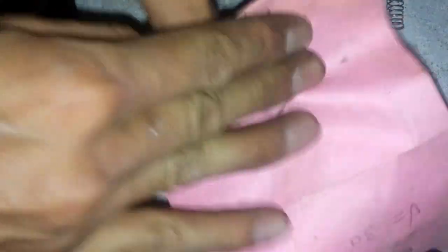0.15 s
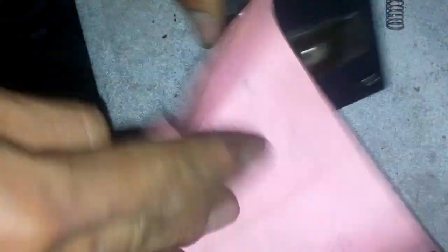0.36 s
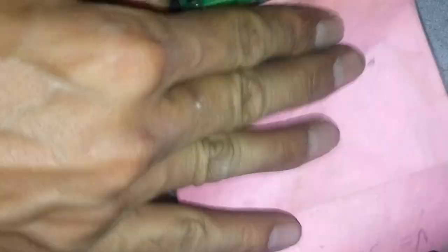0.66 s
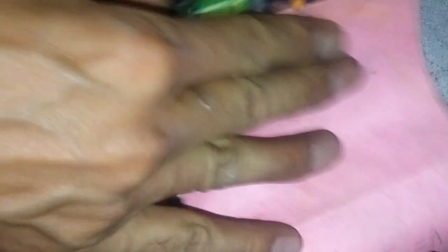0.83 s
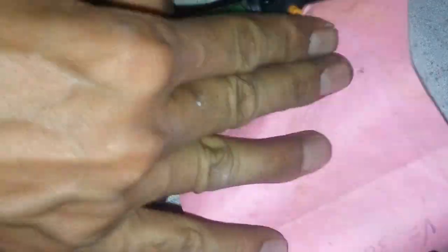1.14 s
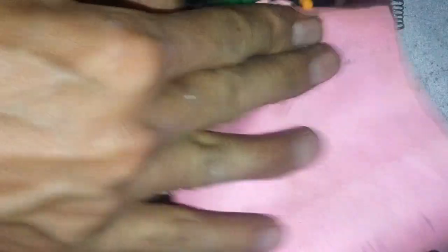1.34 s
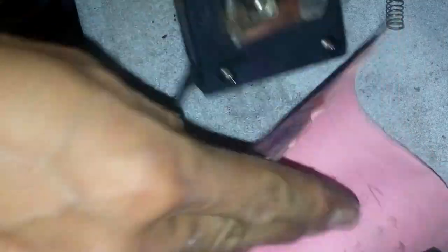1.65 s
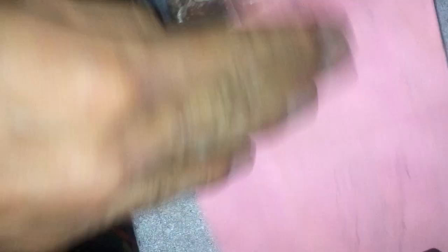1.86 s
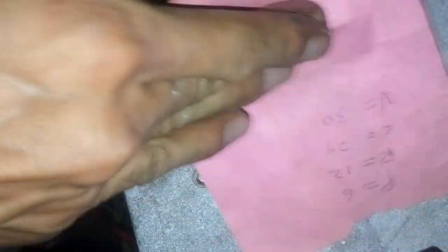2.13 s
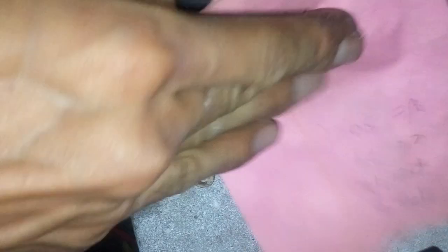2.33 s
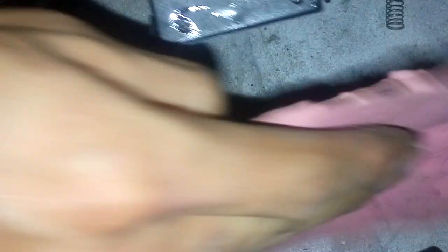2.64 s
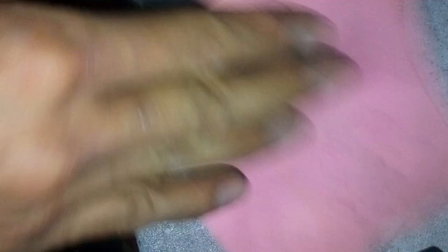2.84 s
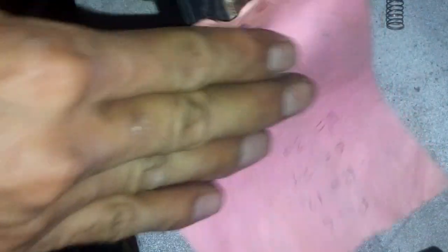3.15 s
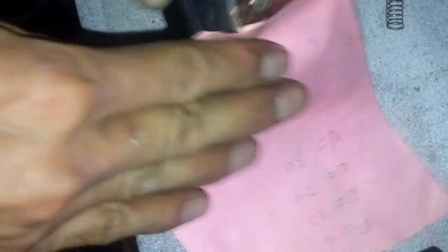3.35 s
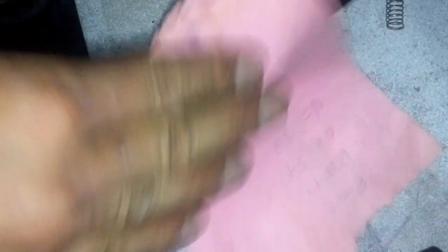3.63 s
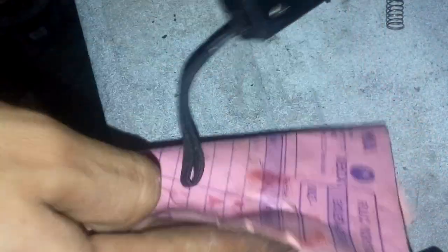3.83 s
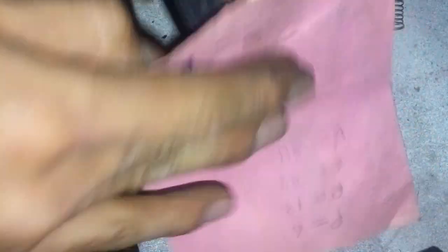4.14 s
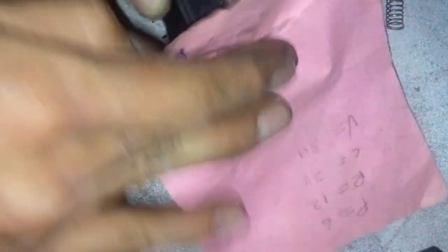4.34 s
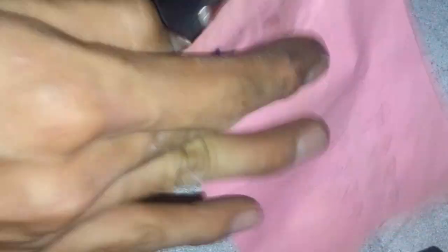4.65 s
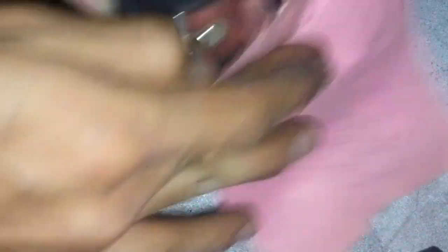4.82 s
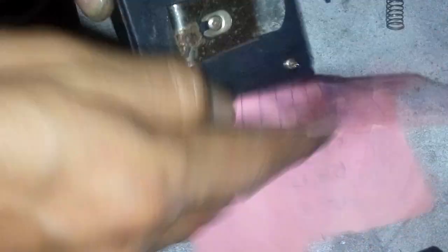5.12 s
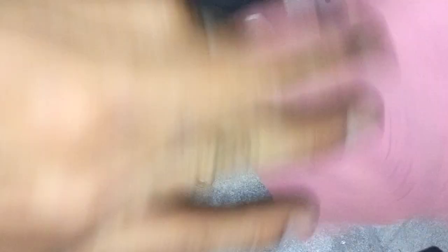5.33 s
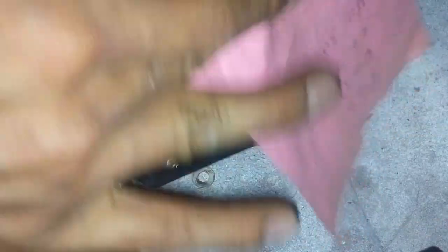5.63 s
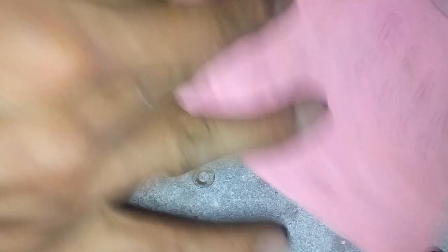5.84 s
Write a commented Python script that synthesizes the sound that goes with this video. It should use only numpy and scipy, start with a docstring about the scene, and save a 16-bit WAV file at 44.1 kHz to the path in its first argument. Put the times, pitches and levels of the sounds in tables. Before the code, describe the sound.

A hand quickly rubs a crisp paper sheet back and forth against a small tool, with bright raspy strokes and sharp crackling snaps.

```python
"""Small quiet room, at a workbench: a hand wipes a sheet of paper back and forth against a small tool.
Strokes rasp, rustle and swish: filtered noise and tiny slips, levelled by a half-sine speed.
Creases and edge snap and click: short rings with scatter, knocks and treble cracks.
The hand pats (dull noise bursts), the tool rocks (damped sines), a fingertip squeaks once (two harmonics).
A short room tail and a faint steady hiss lie behind."""
import sys
import numpy as np
from scipy import signal
from scipy.fft import rfft, irfft, next_fast_len
from scipy.io import wavfile
from scipy.ndimage import uniform_filter1d, minimum_filter1d, map_coordinates

SR = 44100
rng = np.random.default_rng(int(sys.argv[2]) if len(sys.argv) > 2 else 0)


def materialize(psi):
    """Save the field psi as 16-bit PCM at rate SR to the path in sys.argv[1].

    A 1-D psi becomes a single channel; in a 2-D psi each row is a channel.
    """
    bounded = np.clip(np.atleast_2d(psi).T, -1, 1)
    quanta = np.round(bounded * 32767).astype(np.int16)
    wavfile.write(sys.argv[1], SR, quanta)


N = 263715  # samples

# Levels are relative, ahead of the later filters.
# Strokes of the sheet, to and fro: (start [s], length [s], surface rasp [dB], flexing rustle [dB])
STROKES = [(-0.063, 0.16, -40.0, -44), (0.058, 0.098, -27.5, -37), (0.122, 0.13, -34, -45),
           (0.199, 0.2, -39.5, -45.5), (0.339, 0.21, -30, -40.5), (0.479, 0.14, -40.5, -46.5),
           (0.57, 0.21, -57.5, -64), (0.721, 0.076, -48.5, -57.5), (0.79, 0.052, -29, -34.5),
           (0.814, 0.13, -36.5, -47), (0.919, 0.11, -34.5, -40.5), (0.969, 0.19, -34.5, -44),
           (1.131, 0.093, -31, -42), (1.188, 0.16, -32.5, -41), (1.325, 0.11, -40.5, -49.5),
           (1.416, 0.11, -32.0, -41.5), (1.466, 0.43, -47.5, -49.5), (1.49, 0.23, -36, -44),
           (1.83, 0.19, -66, -73), (1.988, 0.18, -48.5, -53), (2.055, 0.027, -31.5, -30),
           (2.146, 0.06, -51.5, -56.5), (2.206, 0.13, -30, -38), (2.312, 0.13, -28.0, -35.5),
           (2.407, 0.14, -32.5, -40.5), (2.493, 0.34, -45, -49), (2.532, 0.13, -26, -34),
           (2.909, 0.128, -60, -71), (3.027, 0.065, -31.5, -37), (3.045, 0.18, -38.5, -51),
           (3.19, 0.13, -39, -47.5), (3.283, 0.093, -37.5, -50.5), (3.359, 0.12, -39.5, -55),
           (3.451, 0.13, -39.5, -51), (3.562, 0.1, -41.5, -51.5), (3.643, 0.15, -36.5, -51),
           (3.692, 0.21, -32, -42), (3.877, 0.072, -41, -48.5), (3.888, 0.16, -56, -64.5),
           (4.047, 0.082, -65.5, -80.5), (4.167, 0.194, -61, -69.5), (4.325, 0.079, -31.5, -37),
           (4.39, 0.15, -35, -47), (4.509, 0.12, -33, -42.5), (4.575, 0.15, -35.5, -44.5),
           (4.679, 0.18, -32.5, -41), (4.797, 0.15, -36.0, -47.5), (4.898, 0.15, -31.0, -43.5),
           (4.952, 0.36, -40.5, -51.0), (5.23, 0.12, -29.5, -38.5), (5.306, 0.093, -42.5, -49),
           (5.333, 0.21, -54.5, -64), (5.513, 0.073, -38.5, -36.0), (5.525, 0.13, -40.5, -43.5),
           (5.641, 0.18, -49, -58), (5.722, 0.22, -45.5, -57), (5.908, 0.13, -34, -46)]
# Creases buckling and the edge catching: (time [s], click level [dB], ring [Hz], sheet knock level [dB])
SNAPS = [(0.1041, 6.5, 5290, -18), (0.138, -14, 3660, -31), (0.2862, -11.5, 5160, -34),
         (0.414, -12, 5700, -31), (0.452, -5.5, 4930, -24), (0.541, -13, 5330, -41),
         (0.5661, -19, 4800, -34.5), (0.7103, -36.5, 5700, -48), (0.816, -3, 5380, -23.5),
         (0.8293, -9.5, 5260, -50), (0.8939, -18, 5270, -34.5), (0.9732, -19, 4350, -38),
         (1.0344, -11.5, 4830, -38), (1.038, -10.5, 4840, -29.5), (1.074, -12.5, 5530, -35.5),
         (1.1134, -24, 4160, -41), (1.2312, -22, 4300, -33), (1.274, -12, 5340, -36),
         (1.6474, -23.5, 5060, -32.5), (1.8476, -29.5, 2630, -53), (1.978, -40, 5000, -50),
         (2.0229, -21.5, 4960, -49), (2.0651, -39, 3250, -26), (2.1076, -28, 5400, -38),
         (2.2218, -5.5, 4620, -33), (2.2601, -7.5, 5100, -27), (2.2635, -7.5, 5250, -22.5),
         (2.282, -9, 5500, -24.5), (2.608, -6, 5100, -30), (2.6205, 0, 5200, -42), (2.7876, -30, 4690, -43),
         (3.045, -7.5, 5420, -34), (3.0515, -7, 5470, -32.5), (3.0621, -10, 5200, -31.5),
         (3.7245, -19, 6100, -38), (3.7611, -8, 5040, -33), (3.793, 0.5, 5150, -23),
         (4.3368, -23.5, 2470, -35), (4.358, -6.5, 5360, -31.5), (4.42, -22, 5500, -39),
         (4.4525, -9.5, 5180, -44), (4.5331, -16, 5440, -36), (4.571, -8, 5180, -47),
         (4.6055, -14, 5200, -31.5), (4.6204, -18.5, 5370, -47), (4.6379, -14, 5060, -40),
         (4.7202, -14.5, 4760, -36), (4.7795, -10, 5970, -28), (4.7941, -15, 5900, -36),
         (4.81, -11.5, 5270, -51), (5.0477, -13, 4500, -41.5), (5.0799, -14.5, 5230, -36),
         (5.5262, -22, 5050, -42), (5.5433, -11.5, 5560, -34), (5.5577, -12, 5440, -35),
         (5.7589, -26.5, 5470, -58)]
# Hand pressing on the bench: (time [s], level [dB], t60 [s])
PATS = [(.105, -65, 0.062), (0.809, -37.5, 0.12), (0.953, -54, 0.59), (2.066, -54, 0.33),
        (2.565, -53, 0.72), (3.046, -42, 0.19), (3.726, -52.5, 0.32), (4.339, -45.5, 0.15),
        (4.959, -51.5, 0.35), (5.531, -47, 0.44)]
# Sheet edge sweeping over the bench: (time [s], level over the rasp [dB])
EDGE_SWISH = [(0, -17.5), (1.62, -13), (1.82, 3.5), (2.1, -16.5), (3.3, -16), (3.62, -7), (3.95, -17.5),
              (4.4, -24.5)]
# Tool rocking on the bench: (time [s], level [dB])
BUMPS = [(1.225, -51), (1.345, -53), (1.423, -46), (1.518, -44.5), (4.610, -43.5), (4.689, -51)]
# Fingertip slip: (time [s], fundamental [Hz], level [dB])
SQUEAK = [(5.780, 2160, -64), (5.79, 2490, -35), (5.803, 2520, -41), (5.818, 2420, -54)]
# Noise spectrum of the sliding surface: (frequency [Hz], relative density [dB])
RASP_SPECTRUM = [(1200, -34.5), (2200, -21.5), (3200, -7), (4200, -3), (4900, 1), (5600, 2.5), (6500, -5.5),
                 (7300, -15.5), (8500, -30), (11000, -40.5), (16000, -63)]
# Noise spectrum of the flexing sheet: (frequency [Hz], relative density [dB])
RUSTLE_SPECTRUM = [(30, -45.5), (90, -7), (250, -8), (500, -1.5), (1400, 2.5), (2300, 0.5), (3800, 0),
                   (6500, -12.5), (10000, -56.5)]
# Treble spectrum of hard strokes and cracks: (frequency [Hz], relative density [dB])
FIZZ_SPECTRUM = [(5000, -33), (8500, -1), (10500, -3), (13000, -11), (16000, -18)]
# Spectrum of the sheet being knocked: (frequency [Hz], relative density [dB])
KNOCK_SPECTRUM = [(60, -39), (250, -20), (550, -6), (1300, 2), (2500, -2.5), (4000, 0.5), (10000, -52)]
# Spectrum of the hand's thud: (frequency [Hz], relative density [dB])
THUD_SPECTRUM = [(25, -31), (80, -8.5), (150, -2.5), (330, -3.5), (550, -8), (1500, -62.5)]
# Spectrum of the steady hiss: (frequency [Hz], relative density [dB])
HISS_SPECTRUM = [(25, -9), (100, 1), (500, -1), (2200, -7), (4000, -5), (5500, -1), (7000, -11),
                 (8500, -17), (16000, -19)]
# Brightness filter over a snap's ring and scatter: (frequency [Hz], relative gain [dB])
SNAP_SPECTRUM = [(300, -8.5), (1500, 3), (3200, 9), (4400, 5), (5500, 2.5), (6600, 7.5), (7500, 3.5),
                 (8700, -8.5), (11000, -32.5), (16000, -61.5)]
# Decay of the room: (frequency [Hz], t60 [s])
ROOM_DECAY = [(200, 0.28), (2000, 0.27), (6000, 0.1), (14000, 0.13)]
# Resonances and dips of the case and the hollow under the hand: (centre [Hz], width [Hz], gain [dB])
HOLLOW_BANDS = [(450, 143, 3.5), (900, 45, 2), (1018, 240, -6), (1220, 167, 4.5), (1784, 65, 2.5),
                (3110, 470, 1.5), (4600, 220, -4.5), (4830, 109, 1), (6054, 200, -3.5), (6600, 108, -0.5)]

SPEED_EXPONENT = 1.584  # stroke amplitude = speed to this power
REST_DB = -79.5  # the resting hand never lies quite still
FIRM_RASP_DB, FIZZ_DB, FIZZ_DB_PER_RASP_DB = -31, -61, 2.3  # fizz level applies at the firm rasp
CREASES_PER_S, CREASE_OVER_RASP_DB, CREASE_SPREAD_DB = 5.8, -4.5, 6.5
CREASE_HZ = 4930  # typical ring
CRACK_DB, CRACK_DB_PER_CLICK_DB, CRACK_DB_PER_HZ = -16, 2.0, 0.005  # last: rise with the snap's ring
HISS_DB, ROOM_DB = -71, -16
BAND_LIMIT_HZ = 15850


def strokes():
    """Rasp and rustle levels in dB: each stroke speeds up from rest and slows down to turn."""
    t = np.arange(N) / SR
    power = np.full((2, N), amp(REST_DB) ** 2)
    for start_s, length_s, rasp_db, rustle_db in STROKES:
        inside = (t > start_s) & (t < start_s + length_s)
        speed = np.abs(np.sin(np.pi * (t[inside] - start_s) / length_s))
        envelopes = np.outer(amp([rasp_db, rustle_db]), speed ** SPEED_EXPONENT)
        power[:, inside] += envelopes ** 2
    return 10 * np.log10(power)


def rubbing(rasp_db, rustle_db):
    """Fibres catch and slip; the same slips drive the surface rasp and the sheet's coarser rustle."""
    grip_db = 2.48 * wobble(150) + 0.32 * wobble(35)
    slips = friction(slips_per_s=1100, spread_db=6.5, slip_share=0.28)
    rasp = amp(rasp_db + grip_db + 1.07) * colour(slips, RASP_SPECTRUM)

    catches = friction(slips_per_s=170, spread_db=6.5, slip_share=0.53)
    flexing = unit(slips + 2.02 * catches)
    rustle = amp(rustle_db + grip_db + 0.62) * colour(flexing, RUSTLE_SPECTRUM)

    swish = edge_swish(rasp_db)
    fizz = stroke_fizz(rasp_db, grip_db)
    return shifting(rasp + rustle + swish + fizz, patchy_db=3.5)


def edge_swish(rasp_db):
    """The edge sweeps over the bench: friction through two broad resonances sounds hollow."""
    over_rasp_db, = curves(EDGE_SWISH)
    scrape = friction(slips_per_s=900, spread_db=4, slip_share=0.3)
    edge = ringing(ringing(scrape, 2610, 1000), 2300, 1700)
    return amp(rasp_db + over_rasp_db) * unit(edge)


def stroke_fizz(rasp_db, grip_db):
    """Fine treble friction: hard strokes grow brighter faster than they grow louder."""
    fizz_db = FIZZ_DB + FIZZ_DB_PER_RASP_DB * (rasp_db - FIRM_RASP_DB)
    fine = friction(slips_per_s=1200, spread_db=4, slip_share=0.5)
    return amp(fizz_db + grip_db + 1.5 * wobble(18)) * colour(fine, FIZZ_SPECTRUM)


def friction(slips_per_s, spread_db, slip_share):
    """Tiny slips of uneven size over a smooth hiss; slip_share is the slips' share of the power."""
    happens = rng.random(N) < slips_per_s / SR
    signs = rng.choice([-1, 1], N)
    sizes = amp(spread_db * np.minimum(rng.standard_normal(N), 2))
    slips = unit(happens * signs * sizes)
    return np.sqrt(slip_share) * slips + np.sqrt(1 - slip_share) * rng.standard_normal(N)


def shifting(x, patchy_db):
    """The hollow under the moving hand keeps shifting: narrow bands swell and fade."""
    z = signal.stft(x, nperseg=512)[2]
    field = uniform_filter1d(rng.standard_normal(z.shape), size=2, axis=0)  # across frequency
    field = uniform_filter1d(field, size=24, axis=1)  # along time
    gain = unit(amp(patchy_db * np.clip(unit(field), -2, 2)))
    return signal.istft(z * gain, nperseg=512)[1][:N]


def snaps(knock_t60_s=0.021, push=6, crest_db=13.0):
    """Each snap clicks, knocks the sheet and cracks in the treble, more so the harder and higher it is."""
    out, t = np.zeros(N), np.arange(SR // 20) / SR
    for time_s, level_db, ring_hz, knock_db in SNAPS:
        click_db = level_db - crest_db
        add(out, time_s, amp(click_db) * snap(ring_hz))

        shake = rng.standard_normal(len(t)) * amp(-60 * t / knock_t60_s)
        shake[0] = push
        add(out, time_s, amp(knock_db - 1.5) * sized(colour(shake, KNOCK_SPECTRUM)))

        crack = colour(rng.standard_normal(len(t)) * amp(-60 * t / 0.01), FIZZ_SPECTRUM)
        pitch_db = CRACK_DB_PER_HZ * (ring_hz - CREASE_HZ)
        crack_db = CRACK_DB + CRACK_DB_PER_CLICK_DB * click_db + pitch_db
        add(out, time_s, amp(crack_db) * sized(crack))
    return out


def snap(ring_hz, rise_s=0.00026, scatter_db=-5, scatter_t60_s=0.012):
    """One buckle: a ring of a few cycles, then its scatter across the sheet and bench."""
    t = np.arange(SR // 20) / SR
    ring = t / rise_s * np.exp(-t / rise_s) * np.sin(2 * np.pi * ring_hz * t)
    paths = rng.standard_normal(len(t)) * amp(-60 * t / scatter_t60_s) * (t > .0008)
    scatter = signal.fftconvolve(ring, paths)[:len(t)]
    return sized(colour(unit(ring) + amp(scatter_db) * unit(scatter), SNAP_SPECTRUM))


def creases(rasp_db):
    """Small creases give way at random moments; their clicks follow the rasp level, with scatter."""
    out = np.zeros(N)
    chance = rng.random(N)
    for i in np.flatnonzero(chance < CREASES_PER_S / SR):
        size, pitch = rng.standard_normal(2)
        level_db = rasp_db[i] + CREASE_OVER_RASP_DB + CREASE_SPREAD_DB * size
        add(out, i / SR, amp(level_db) * snap(CREASE_HZ * np.exp(.08 * pitch)))
    return out


def pats(rise_s=0.0029):
    """Soft flesh on paper: a dull noise thud without ring."""
    out, t = np.zeros(N), np.arange(SR // 3) / SR
    for time_s, level_db, t60_s in PATS:
        thud = unit(colour(rng.standard_normal(len(t)), THUD_SPECTRUM))
        envelope = amp(level_db - 60 * t / t60_s) * (1 - np.exp(-t / rise_s))
        add(out, time_s, envelope * thud)
    return out


def bumps(mode_hz=490, t60_s=.04):
    """The tool's case rings briefly in its lowest mode, damped and detuned by the grip."""
    out, t = np.zeros(N), np.arange(SR // 10) / SR
    for time_s, level_db in BUMPS:
        pitch_hz = mode_hz * (1 + .06 * rng.standard_normal())
        knock = amp(-60 * t / t60_s) * np.sin(2 * np.pi * pitch_hz * t)
        add(out, time_s, amp(level_db) * sized(knock))
    return out


def squeak(jitter=0.035, third_db=-7):
    """Skin sticks and slips fast and unevenly; only its second and third harmonics sound."""
    pitch_hz, level_db = curves(SQUEAK)
    t = np.arange(N) / SR
    slipping = (t > SQUEAK[0][0]) & (t < SQUEAK[-1][0])
    phase = 2 * np.pi * np.cumsum(pitch_hz * (1 + jitter * wobble(1200))) / SR
    harmonics = np.sin(2 * phase) + amp(third_db) * np.sin(3 * phase)
    return amp(level_db) * slipping * harmonics


def hollow(x):
    """Case and hand cavity: each resonance lifts or dips its own band."""
    for centre_hz, width_hz, gain_db in HOLLOW_BANDS:
        x = x + (amp(gain_db) - 1) * ringing(x, centre_hz, width_hz)
    return x


def room(x):
    """A short diffuse tail, 5 ms late, whose treble dies sooner than its bass."""
    hz, t, z = signal.stft(rng.standard_normal(SR // 3), SR, nperseg=256)
    decay = amp(-60 * t / along(ROOM_DECAY, hz)[:, None])
    tail = signal.istft(z * decay, SR, nperseg=256)[1]
    response = np.pad(tail / np.linalg.norm(tail), (SR // 200, 0))
    return signal.fftconvolve(x, response)[:N]


def background_hiss():
    """Faint steady hiss: coloured noise."""
    return amp(HISS_DB) * colour(rng.standard_normal(N), HISS_SPECTRUM)


def ringing(x, centre_hz, width_hz):
    """One resonance with unit gain at its centre."""
    return signal.lfilter(*signal.iirpeak(centre_hz, centre_hz / width_hz, SR), x)


def colour(x, spectrum, size=4096):
    """Causal minimum-phase filter of the given spectrum; white noise keeps its power."""
    gain = unit(amp(along(spectrum, np.fft.rfftfreq(size, 1 / SR))))
    cepstrum = irfft(np.log(gain))
    cepstrum[1:size // 2] *= 2  # fold onto positive time
    cepstrum[size // 2 + 1:] = 0
    response = irfft(np.exp(rfft(cepstrum)))
    return signal.fftconvolve(x, response)[:len(x)]


def wobble(knots_per_s):
    """A smooth random curve through normally distributed knots."""
    knots = rng.standard_normal(N // 8)
    return map_coordinates(knots, [np.arange(N) * knots_per_s / SR], mode="wrap")


def curves(rows):
    """One value per sample for each column after the time."""
    time_s, *columns = np.transpose(rows)
    return [np.interp(np.arange(N) / SR, time_s, column) for column in columns]


def along(points, hz):
    """Read (frequency [Hz], value) points on a log axis."""
    point_hz, values = np.transpose(points)
    return np.interp(np.log(hz + 1), np.log(point_hz + 1), values)


def amp(db):
    """Decibels to gain."""
    return 10 ** (np.asarray(db) / 20)


def unit(x):
    """Scale to rms 1."""
    return x / np.sqrt(np.mean(x ** 2) + 1e-20)


def sized(hit):
    """Scale a hit to rms 1 over its first 5 ms."""
    return hit / np.sqrt(np.mean(hit[:SR // 200] ** 2))


def add(track, time_s, sound):
    """Mix a sound into a track."""
    part = track[max(round(time_s * SR), 0):][:len(sound)]
    part += sound[:len(part)]


def scene():
    """Paper, hand and tool in a small room over a faint steady hiss."""
    rasp_db, rustle_db = strokes()
    paper = rubbing(rasp_db, rustle_db) + snaps() + creases(rasp_db)
    near = hollow(paper) + pats() + bumps() + squeak()
    return (near + amp(ROOM_DB) * room(near) + background_hiss())[None]


def record(dry):
    """A limiter holds down the highest peaks; nothing is kept above the band limit."""
    ceiling = .76
    needed = ceiling / np.maximum(np.abs(dry), ceiling)
    gain = uniform_filter1d(minimum_filter1d(needed, size=48), size=32)
    size = next_fast_len(N + SR // 4)
    kept = np.fft.rfftfreq(size, 1 / SR) < BAND_LIMIT_HZ
    return irfft(rfft(dry * gain, size) * kept, size)[:, :N]


dry = scene()
out = record(dry)
materialize(out)
```